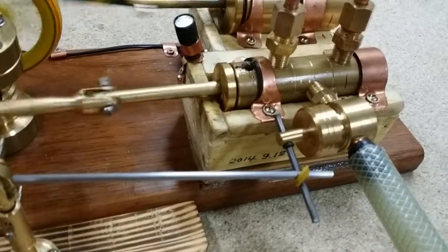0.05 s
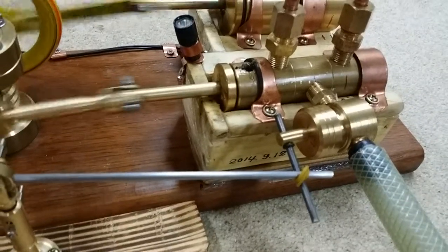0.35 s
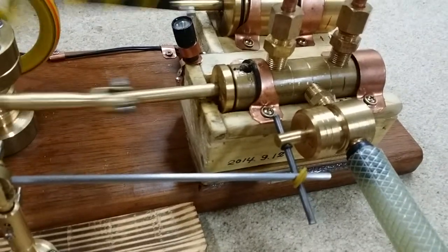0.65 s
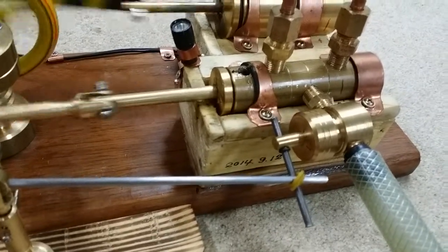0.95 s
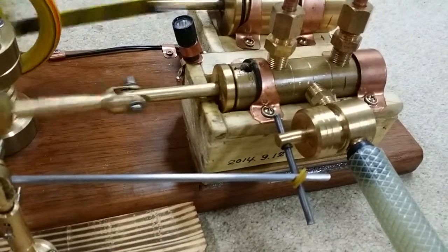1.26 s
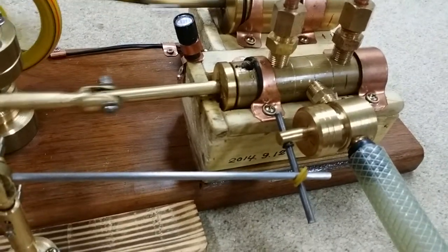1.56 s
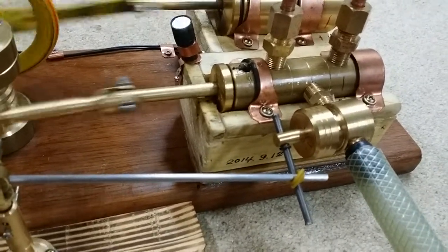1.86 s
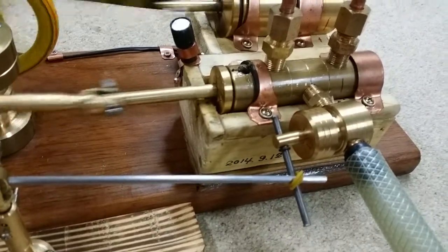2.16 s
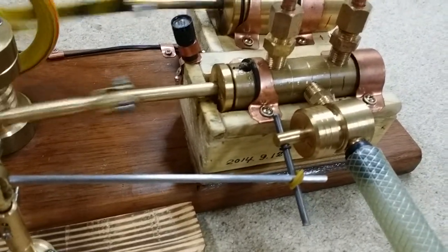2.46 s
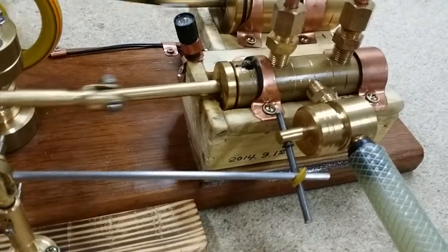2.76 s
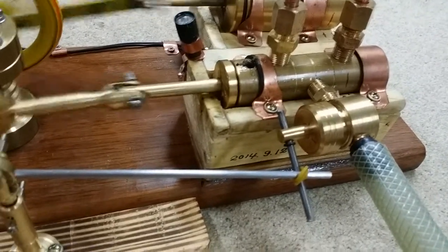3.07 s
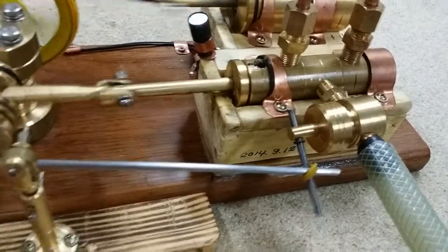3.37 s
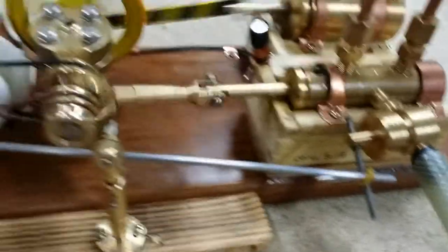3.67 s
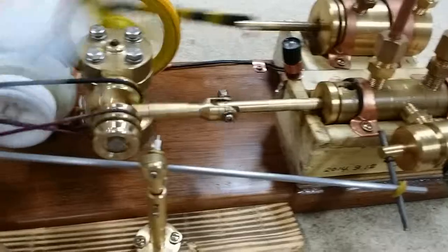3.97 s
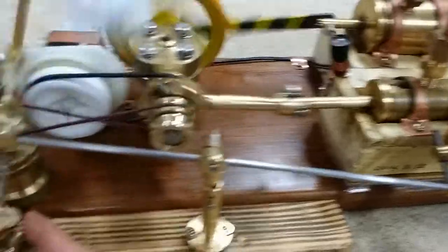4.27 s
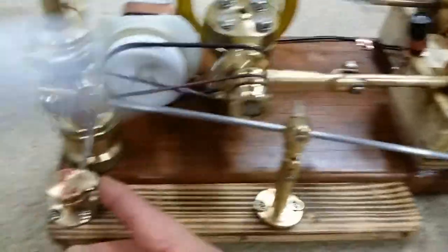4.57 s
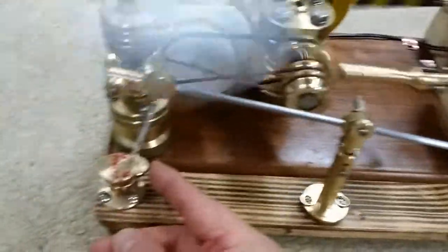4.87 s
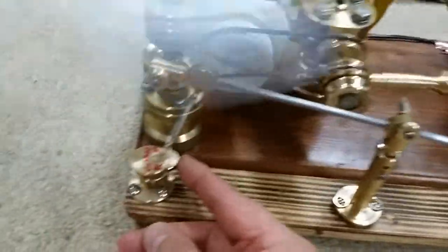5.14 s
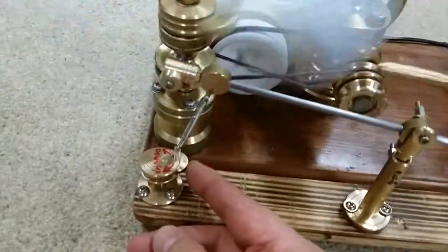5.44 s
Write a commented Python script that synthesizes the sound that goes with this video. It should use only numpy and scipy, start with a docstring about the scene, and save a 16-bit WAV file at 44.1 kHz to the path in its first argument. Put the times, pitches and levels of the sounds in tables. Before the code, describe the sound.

A small brass steam engine runs throughout, heard close up on a wooden board. Each turn gives a tiny tick and a bright metallic knock with a woody body and a brief high ring. The knocks start at nearly six a second and ease to just under five by about 3 seconds, then hold steady. Between them come soft piston thumps, dry valve clicks, short rising squeaks and dull pulley taps that drift off the beat. Steam hisses all along, puffing lightly each turn and gradually softening. It spits briefly at about 0.3, 0.8, 1.5, 2.3 and 2.9 seconds, the last four with a small clink. Faint thin bearing whistles appear around 2.7, 3.2 and from 4.6 to 5.1 seconds. The squeaks fade after 4.2 seconds. The engine drifts from slightly left to slightly right and is still running at 5.7 seconds, with a short workshop echo and low room rumble.

```python
"""A small brass steam engine

On a wooden board in a small workshop, heard up close, it turns about five times a second, slowing a bit.
Once a turn the slack in its rod closes with a tick and a bright knock that rings the flywheel. In
between, the piston thumps softly, the valve clicks and squeaks, and a belt pulley taps. Steam hisses
all along, swells with each turn and spits now and then; a loose link clinks and a dry bearing whistles."""
import sys
import numpy as np
from scipy import signal
from scipy.fft import rfft, irfft, next_fast_len
from scipy.io import wavfile

SR = 44100
rng = np.random.default_rng(int(sys.argv[2]) if len(sys.argv) > 2 else 0)


def to_wav(sig):
    """Store sig (one row per channel, or 1-D mono) as 16-bit WAV at the path in sys.argv[1].

    Samples outside -1..1 are clipped; the rate is SR.
    """
    pcm = np.clip(np.atleast_2d(sig), -1, 1) * 32767
    pcm = np.round(pcm).astype(np.int16)
    wavfile.write(sys.argv[1], SR, pcm.T)  # frames by channels


N = 251811
TIME = np.arange(N) / SR
AGE = np.arange(8192) / SR   # seconds since the start of one short sound

# How fast the crank spins. Each row: time in seconds, turns per second.
CRANK_SPEED = [(0, 5.905), (.28, 5.6286), (.84, 5.4389), (3.08, 4.8407), (4.01, 4.8093), (5.7, 4.8481)]
# The tones of the brass rod and cylinder. Each row: pitch in Hz, width in Hz, relative level in dB.
BRASS_TONES = [(3025, 260, -8.5), (5480, 150, -4.5), (6050, 108, 7), (6467, 606, 7.5), (6815, 588, 10),
               (7990, 340, 2.5), (8220, 12, -30), (9180, 19, 7), (9960, 94, 1), (11540, 106, -10),
               (12610, 40, -14), (13850, 170, -7.5), (14700, 180, -25)]


def from_db(db):
    """Turn decibels into a number to multiply a sound by."""
    return 10 ** (np.asarray(db) / 20)


def along(rows, times):
    """Read a table at any times, drawing straight lines between its rows."""
    row_times, *columns = np.transpose(rows)
    return [np.interp(times, row_times, column) for column in columns]


def colour(x, points):
    """Make some pitches louder and others softer, following a curve of (Hz, dB) points."""
    size = next_fast_len(x.shape[-1] + 2048)
    hz, db = np.transpose(points)
    gain = from_db(np.interp(np.log(np.fft.rfftfreq(size, 1 / SR) + 1), np.log(hz), db))
    return irfft(rfft(x, size) * gain, size)[..., :x.shape[-1]]


def air_noise(size, alike_below_hz=1110):
    """White stereo noise, alike on both sides in the bass and unrelated in the treble."""
    alike = 0.89 / (1 + (np.fft.rfftfreq(size, 1 / SR) / alike_below_hz) ** 2)
    mid, side = rfft(rng.standard_normal((2, size)))
    return irfft(np.sqrt((1 + alike) / 2) * mid + np.sqrt((1 - alike) / 2) * side * [[1], [-1]], size)


def wobble(hz):
    """A smooth random wander, typically about 1 in size; a higher hz makes it quicker."""
    x = signal.sosfilt(signal.butter(2, hz, fs=SR, output="sos"), rng.standard_normal(N + SR))[SR:]
    return x / x.std()


def resonate(x, hz, width_hz):
    """Let through the sound near one pitch; the narrower the width, the longer it rings."""
    r = np.exp(-np.pi * width_hz / SR)
    feedback = [1, -2 * r * np.cos(2 * np.pi * hz / SR), r * r]
    return signal.lfilter(np.array([1, 0, -1]) * (1 - r * r) / 2, feedback, x + 1e-18)


def fade(age, decay_s):
    """A sudden start that dies away."""
    return (age >= 0) * np.exp(-np.clip(age / decay_s, 0, 60))


def swell(age, half_width_s):
    """A smooth rise and fall that peaks at age zero."""
    return np.exp(-(age / half_width_s) ** 2 / 2)


def place(times, sounds):
    """Lay short sounds out in time, in stereo."""
    out = np.zeros((2, N))
    for start_s, sound in zip(times, sounds):
        i = int(start_s * SR)
        if 0 <= i < N:
            out[:, i:i + len(AGE)] += sound[..., :N - i]
    return out


def crank_turns(first_knock_s=0.1505):
    """How many turns the crank has made at each moment, counted from the first knock."""
    speed, = along(CRANK_SPEED, TIME)
    turns = np.cumsum(speed) / SR
    return turns - np.interp(first_knock_s, TIME, turns)


def crank_passes(share, every_turns=1):
    """The times when the crank reaches this share of a turn, and again at equal steps of turning."""
    turns = crank_turns()
    passes = share + every_turns * np.arange(-1, turns[-1] / every_turns + 1)
    return np.interp(passes[(passes > turns[0]) & (passes < turns[-1])], turns, TIME)


def struck(times, level_db, tones, scatter_db):
    """A struck object rings with several fading tones, a little differently on every blow."""
    hz, db, ring_s = np.transpose(tones)   # ring time: how long a tone takes to fall by 60 dB
    waves = np.sin(2 * np.pi * hz[:, None] * AGE) * from_db(-60 * AGE / ring_s[:, None])
    strengths = from_db(level_db[:, None] + db + scatter_db * rng.standard_normal((len(times), len(hz))))
    return place(times, (strengths * (-1) ** np.arange(len(hz))) @ waves)


def brass_hit(times, level_db, force, tones, snap=0, sides_alike=0.17):
    """A clean snap and a rough scrape make brass ring; the level is that of the first 8 ms."""
    rough = rng.choice([-1, 1], (len(times), 3, len(AGE)))
    grit = np.sqrt(sides_alike) * rough[:, :1] + np.sqrt(1 - sides_alike) * rough[:, 1:]
    push = grit * force + snap * (AGE == 0)
    rings = sum((-1) ** k * from_db(db) * resonate(push, hz, width)
                for k, (hz, width, db) in enumerate(tones))
    early_level = np.sqrt(np.mean(rings[..., AGE < 0.008] ** 2, axis=-1, keepdims=True))
    return place(times, rings / early_level * from_db(level_db)[:, None, None])


def room_rumble():
    """The room's own steady, low noise."""
    # Each row: pitch in Hz, level in dB.
    rumble_colour = [(20, -62), (45, -71), (70, -30.5), (105, -22), (140, -23.5), (200, -32.5), (300, -31),
                     (500, -44.5), (1500, -41.5), (8000, -84)]
    return colour(air_noise(N), rumble_colour)


def workshop_echo(x, delay_s=0.008, ring_s=0.18):
    """Sound bounces off the floor and walls and comes back as a short wash of echoes."""
    # The tone of the echo. Each row: pitch in Hz, gain in dB.
    echo_colour = [(60, -14), (120, -15.5), (300, -0.5), (900, -8.5), (3000, -5), (6500, -7.5),
                   (10000, -10), (15000, -13)]
    age = np.arange(SR // 2) / SR
    tail = air_noise(len(age)) * fade(age - delay_s, ring_s / np.log(1000))
    tail = colour(tail / np.sqrt(np.sum(tail ** 2) / 2), echo_colour)
    return signal.fftconvolve(x, tail, axes=1)[:, :N]


def port_opening(open_at=0.66, shuts_from=0.84, start_db=-16, open_db=-1, end_db=-38):
    """Steam let out, in dB: it builds through each turn, holds, and is cut off before the knock."""
    share = crank_turns() % 1
    opening = np.clip(share / open_at, 0, 1) ** 2
    shutting = np.clip((share - shuts_from) / (1 - shuts_from), 0, 1)
    return start_db + (open_db - start_db) * opening + (end_db - open_db) * shutting


def leak(level_db, flutter_db=1.5):
    """Leaking steam hisses and sounds the brass fittings around it."""
    # The tone of the hiss. Each row: pitch in Hz, relative level in dB.
    hiss_colour = [(300, -39), (1100, -38), (1900, -36.5), (3600, -34.5), (5100, -34), (5900, -32.5),
                   (7100, -23), (8000, -24.5), (9200, -25), (10000, -30), (11000, -37), (14500, -51)]
    # The fittings. Each row: pitch in Hz, width in Hz, relative level in dB.
    fitting_tones = [(1500, 49, -54), (2050, 250, -32.5), (3230, 240, -41), (5066, 240, -35.5),
                     (6250, 110, -29), (7380, 570, -22.5), (8900, 85, -36)]
    jet = air_noise(N)
    fittings = sum(from_db(db) * resonate(jet, hz, width) for hz, width, db in fitting_tones)
    return (colour(air_noise(N), hiss_colour) + fittings) * from_db(level_db + flutter_db * wobble(28))


def exhaust(level_db, flutter_db=3, sputter_db=3):
    """Wet steam sputters out of a pipe; the water in it favours now one tone, now another."""
    # The pipe. Each row: pitch in Hz, width in Hz, relative level in dB.
    pipe_tones = [(564, 225, -28.5), (1437, 130, -24), (1706, 125, -17.5), (2090, 133, -18),
                  (2705, 170, -25.5), (3330, 100, -26.5), (3630, 140, -32.5), (4140, 180, -25.5),
                  (4700, 190, -30), (6930, 205, -16.5), (8400, 130, -29)]
    # The rush of steam. Each row: pitch in Hz, relative level in dB.
    rush_colour = [(150, -39), (600, -28.5), (1050, -34.5), (2000, -63), (3600, -32), (4900, -36),
                   (5800, -47), (7200, -31), (9000, -34), (11000, -40), (14500, -39)]
    jet = air_noise(N)
    pipe = sum(from_db(db + flutter_db * wobble(16.6)) * resonate(jet, hz, width)
               for hz, width, db in pipe_tones)
    return (colour(air_noise(N), rush_colour) + pipe) * from_db(level_db + sputter_db * wobble(120))


def steam(leak_db=-0.93, exhaust_db=-4, leak_follows_port=0.066):
    """The steam supply feeds a nearly steady leak and an exhaust that puffs once a turn."""
    # Each row: time in seconds, leak in dB, exhaust in dB. Only the change from the average counts.
    supply = [(0.0, -30.5, -38.5), (0.57, -29.5, -40.5), (1.24, -32, -42), (1.41, -32, -40),
              (1.76, -34, -46.5), (3.13, -33.5, -46), (3.75, -36, -47), (4.52, -34.5, -50.5),
              (5.71, -34.5, -51.5)]
    leak_drift_db, exhaust_drift_db = (db - db.mean() for db in along(supply, TIME))
    port_db = port_opening()
    hiss = leak(leak_db + leak_drift_db + leak_follows_port * (port_db - port_db.mean()))
    return hiss + exhaust(exhaust_db + exhaust_drift_db + port_db)


def spits(ragged_db=1.5):
    """Slugs of water burst out with the steam in short, ragged hisses that ring the pipe."""
    # Each row: start in seconds, relative level in dB, fade time in seconds.
    slugs = [(.319, -18.5, 0.0065), (0.748, -25.5, 0.017), (0.768, -27, 0.0058), (1.485, -23, 0.011),
             (1.51, -32, 0.015), (2.286, -23.5, 0.0092), (2.3, -32, 0.0096), (2.309, -17, 0.004),
             (2.938, -23.5, 0.0014)]
    # The tone of a spit. Each row: pitch in Hz, gain in dB.
    spit_colour = [(200, -28), (900, -6.5), (1850, 7.5), (2130, 13), (2400, 5), (3600, 3), (4900, 7.5),
                   (6200, 1.5), (8000, 11.5), (9800, 6), (11500, -3.5), (15000, -14)]
    times = [start_s for start_s, _, _ in slugs]
    bursts = place(times, [from_db(db) * fade(AGE, decay_s) for _, db, decay_s in slugs])
    return colour(air_noise(N) * bursts * from_db(-ragged_db * wobble(460)), spit_colour)


def rub(middle_s, half_width_s, hz, glide_hz_per_s, db, rough):
    """Rubbing swells into a thin, gliding whistle; more roughness makes it waver more."""
    age = AGE - AGE.mean()
    waver = np.interp(AGE * 330, np.arange(64), rng.standard_normal((64, 2)) @ [1, 1j])
    cycles = hz * age + glide_hz_per_s * age ** 2 / 2
    whistle = np.real((1 + rough * waver) * np.exp(2j * np.pi * cycles))
    return place([middle_s - AGE.mean()], [from_db(db) * swell(age, half_width_s) * whistle])


def dry_bearing():
    """A dry bearing rubs and whistles faintly now and then."""
    # Each row: middle in seconds, half-width in seconds, pitch in Hz, glide in Hz a second, level in dB.
    whistles = [(2.7, .02, 2850, -500, -44), (3.162, .018, 3160, -300, -39),
                (3.175, .022, 2680, -600, -42.5), (4.615, .03, 2870, 500, -42),
                (4.635, .018, 3100, 1200, -43.5), (4.92, .016, 2780, -1000, -40.5),
                (5.12, .018, 2770, 0, -42.5)]
    return sum(rub(*row, rough=0.65) for row in whistles)


def valve_squeaks(pitch_hz=2010, spread_hz=50, spread_db=2):
    """The valve rod rubs with a short rising squeak on every turn, no two alike."""
    # Each row: time in seconds, level in dB.
    loudness = [(0, -30), (1, -31.5), (2, -31), (3.3, -29.5), (4.2, -32.5), (4.7, -42), (5.7, -41)]
    times = crank_passes(0.507)
    off_hz, off_db = (rng.standard_normal((len(times), 2)) * [spread_hz, spread_db]).T
    level_db, = along(loudness, times)
    return sum(rub(middle_s, half_width_s=0.0042, hz=hz, glide_hz_per_s=15000, db=db, rough=0.15)
               for middle_s, hz, db in zip(times, pitch_hz + off_hz, level_db + off_db))


def link_clinks(falloff_db_per_octave=14):
    """A loose link clinks; where it is hit decides which of its tones ring most."""
    # Each row: start in seconds, relative level in dB, favoured pitch in Hz.
    clinks = [(.752, -29, 4130), (0.769, -31, 4300), (1.486, -31, 2090), (1.517, -32, 2090),
              (2.286, -23, 5580), (2.308, -31, 4700), (2.937, -19.5, 7500)]
    # The link. Each row: pitch in Hz, relative level in dB, ring time in seconds.
    link_tones = [(2090, 19, 0.027), (2860, 0, .05), (3220, 2, .05), (4130, -13, 0.088), (4640, 2, 0.028),
                  (5580, -3, .03), (5700, -4, 0.018), (7900, 6, 0.025), (8750, 9, 0.022)]
    hz, db, ring_s = np.transpose(link_tones)
    out = 0
    for start_s, level_db, main_hz in clinks:
        tone_db = db - falloff_db_per_octave * abs(np.log2(hz / main_hz))
        out = out + struck([start_s], np.array([level_db]), np.c_[hz, tone_db, ring_s], scatter_db=1.5)
    return out


def pulley_taps(gap_s=0.024, spread_db=1.5, settled_turns_per_s=4.82):
    """The belt pulley runs a bit quicker than the crank, so its pairs of dull taps drift off the beat."""
    # The pulley and its stand. Each row: pitch in Hz, relative level in dB, ring time in seconds.
    pulley_tones = [(480, 10, 0.0085), (594, 6.5, 0.026), (870, 2, 0.021), (1223, -7.5, 0.056),
                    (1860, -17, 0.011)]
    times = crank_passes(-0.1927, every_turns=0.92434)
    speed, = along(CRANK_SPEED, times)
    first_db = -38.5 + 9.2 * (speed - settled_turns_per_s)   # louder at higher speed
    second_db = -37 - 2.5 * (-1) ** np.arange(len(times))   # weak and strong by turns
    level_db = np.r_[first_db, second_db] + spread_db * rng.standard_normal(2 * len(times))
    return struck(np.r_[times, times + gap_s], level_db, pulley_tones, scatter_db=1.7)


def valve_clicks(decay_s=0.0014, rise_s=0.0003, jitter_s=0.0008):
    """The valve gear gives a light, dry click each time it reverses."""
    # Each row: when it comes as a share of the turn, relative level in dB.
    reversals = [(0.482, -25.5), (0.849, -31.5)]
    force = fade(AGE, decay_s) - fade(AGE, rise_s)
    clicks = 0
    for share, db in reversals:
        times = crank_passes(share)
        times = times + rng.normal(0, jitter_s, len(times))
        clicks = clicks + brass_hit(times, np.full(len(times), db), force, BRASS_TONES)
    return from_db(-0.5) * resonate(clicks, hz=7850, width_hz=1200)


def piston_thumps(middle_s=0.02):
    """Each reversal of the piston gives the board a short, smooth heave, and it rocks back."""
    # Each row: share of the turn, pitch in Hz, half-width in seconds, relative level in dB.
    heaves = [(0.095, 111, 0.0088, -33.5), (0.434, 162, 0.0029, -24.5), (0.503, 192, 0.0034, -46),
              (0.572, 103, 0.0087, -45), (0.874, 130, 0.003, -26.5)]
    # How heavy the strokes are. Each row: time in seconds, gain in dB.
    stroke_weight = [(0, 1.5), (1.3, 1), (1.8, -2.5), (3, -3.5), (5.7, -2.5)]
    age = AGE - middle_s
    out = 0
    for share, hz, half_width_s, db in heaves:
        times = crank_passes(share) - middle_s
        heave = np.cos(2 * np.pi * hz * age) * swell(age, half_width_s)
        out = out + place(times, from_db(db + rng.normal(0, 1, (len(times), 1))) * heave)
    weight_db, = along(stroke_weight, TIME)
    return out * from_db(weight_db)


def board_knock(times, level_db, push_hz=760):
    """A blow reaches the wooden board as one short, hard push and sets it ringing."""
    # The board and frame. Each row: pitch in Hz, relative level in dB, ring time in seconds.
    board_tones = [(106.2, -15.5, 0.056), (175, -15.5, 0.13), (252, -20, 0.13), (332, -25, 0.12),
                   (381, -22, 0.31), (495.5, -22, 0.18), (581.6, -6.5, 0.082), (751.5, -4, 0.059),
                   (870, 4.5, 0.015), (860, -22, 0.0067), (1380, 0, 0.021), (1477, -6.5, 0.023),
                   (1730, -31, 0.028), (2125, -5.5, 0.023), (2780, -15, 0.017), (2950, -33, 0.005)]
    ring = struck(times + 0.00167, level_db - 3.5, board_tones, scatter_db=2.5)
    age = AGE - 0.002276   # the push peaks just after the blow
    push = -np.cos(2 * np.pi * push_hz * age) * swell(age, 0.000067)
    return ring + place(times, from_db(level_db + 6)[:, None] * push)


def frame_rattle(times, level_db, shape, alike=0.35):
    """The frame's many tones blur into a noisy rattle that is partly the same on every blow."""
    # Each row: pitch in Hz, gain in dB.
    rattle_colour = [(200, 15), (500, 10), (850, 19.5), (1500, 18.5), (3100, 17), (4200, 13), (6000, 6.5),
                     (8000, -22), (11000, -2), (15000, -20)]
    usual = air_noise(len(AGE))
    noise = np.array([np.sqrt(alike) * usual + np.sqrt(1 - alike) * air_noise(len(AGE)) for _ in times])
    return place(times, from_db(level_db)[:, None, None] * shape * colour(noise, rattle_colour))


def flywheel_ring(times, level_db, in_step_s=0.00721):
    """Two close tones of the flywheel drift in and out of step, so its ring dips and comes back."""
    # Each row: pitch in Hz, relative level in dB, ring time in seconds before the stretch below.
    wheel_tones = [(6155, 4, .095), (8347, 11, .15), (8381, 5.5, .15)]
    stretch = rng.uniform(0.7, 1.1, (len(times), 1))   # the crank damps it more on some turns
    ring = sum(from_db(db - 60 * AGE / (ring_s * stretch)) * np.sin(2 * np.pi * hz * (AGE - in_step_s))
               for hz, db, ring_s in wheel_tones)
    return place(times, from_db(level_db)[:, None] * ring)


def rod_knocks(tick_lead_s=0.0062):
    """The rod ticks through its slack, slams home, bounces, and shakes the board, frame and flywheel."""
    # Each row: start in seconds, then relative levels in dB of the crack, board, flywheel and tick.
    blows = [(0.151, -17, -20, -39, -41), (0.3271, -15.5, -19, -30.5, -28),
             (0.5067, -15, -19.5, -28.5, -37), (0.6866, -16.5, -21.5, -30, -27),
             (0.8701, -16.5, -22, -33, -41), (1.0548, -15.5, -23, -30, -36), (1.2421, -15.5, -23, -38, -26),
             (1.4304, -16.5, -22, -28.5, -32), (1.6225, -16, -22, -42, -46),
             (1.8129, -19.5, -21.5, -33, -26), (2.0064, -18, -22, -31.5, -30),
             (2.2019, -18.5, -24, -29, -25), (2.4011, -19, -24, -29, -31), (2.6005, -19, -22.5, -28, -38),
             (2.8039, -19.5, -24, -39, -29), (3.008, -18.5, -22.5, -29.5, -24.5),
             (3.2148, -17.5, -24.5, -30.5, -30), (3.4214, -19, -24, -31.5, -24.5),
             (3.629, -18, -23.5, -36, -33), (3.8358, -16.5, -23.5, -35.5, -42),
             (4.0446, -15, -22, -38, -30), (4.2512, -14, -23, -40, -35), (4.4602, -15, -23, -50, -43),
             (4.6674, -15, -24, -30, -26), (4.875, -15.5, -23, -36, -25.5),
             (5.0806, -16.5, -24.5, -36, -23.5), (5.2869, -15.5, -24, -36, -27.5),
             (5.493, -16, -23, -33, -28.5), (5.7007, -13.5, -23.5, -33, -28)]
    # The rod alone, sliding through its slack. Each row: pitch in Hz, width in Hz, relative level in dB.
    rod_tones = [(2490, 220, -11), (4300, 260, -11), (6650, 110, 2), (8500, 1600, -21), (10070, 106, 8),
                 (13600, 140, -11)]
    times, crack_db, board_db, wheel_db, tick_db = np.transpose(blows)
    tick_times = times - tick_lead_s
    bounce_s = rng.uniform(0.0011, 0.0048, (len(times), 1, 1))
    scrape = from_db(-4) * fade(AGE, 0.0013)
    bounce = from_db(-8.5) * fade(AGE - bounce_s, 0.0027)
    buzz = from_db(-26) * fade(AGE, 0.014)
    crack = brass_hit(times, crack_db + 1, scrape + bounce + buzz, BRASS_TONES, snap=4.5)
    tick = brass_hit(tick_times, tick_db - 2, fade(AGE, 0.005), rod_tones, snap=5.2)
    wood = board_knock(times, board_db)
    # the frame stirs at the tick, and its rattle builds up just after the blow
    stir = frame_rattle(tick_times, tick_db - 13.5, fade(AGE, 0.0099))
    shake = fade(AGE, 0.0057) - fade(AGE, 0.0015) + from_db(-31) * fade(AGE, 0.0048)
    rattle = frame_rattle(times, board_db - 4, shake)
    return crack + tick + wood + stir + rattle + flywheel_ring(times, wheel_db - 1)


def scene(parts_left_db=1):
    """The engine and its steam drift from a little left to a little right, over the room's rumble."""
    # Each row: time in seconds, how much louder the left is in dB, how much later it is in milliseconds.
    position = [(0, 1.2, -0.24), (2.8, 2, -0.21), (3.7, 1, -0.14), (4.7, -2, -0.04), (5.7, -2.8, 0.048)]
    pan_db, lag_ms = along(position, TIME)
    leftward = np.array([[0.5], [-0.5]])   # half is added on the left, half taken from the right
    moving_parts = rod_knocks() + valve_clicks() + pulley_taps() + link_clinks()
    hits = moving_parts * from_db(parts_left_db * leftward) + spits()
    thumps = piston_thumps()
    left, right = (hits + valve_squeaks() + dry_bearing() + steam()) * from_db(pan_db * leftward)
    lag_samples = np.round(lag_ms * SR / 1000)
    right = np.interp(TIME + lag_samples / SR, TIME, right)
    return np.array([left, right]) + thumps + workshop_echo(hits + thumps) + room_rumble()


def record(dry, bass_cut_hz=70, top_cut_hz=14750):
    """The microphone cuts the deep bass, dulls the right side, clips peaks and cuts the highest treble."""
    # The tone of the microphone's right side. Each row: pitch in Hz, gain in dB.
    right_colour = [(1000, 0), (4000, -1), (5500, 4), (6200, 2.5), (7000, -6.5), (8000, -12.5), (9200, -12),
                    (10500, -10.5), (12000, -6.5), (14000, -12)]
    left, right = signal.sosfilt(signal.butter(2, bass_cut_hz, "high", fs=SR, output="sos"), dry)
    clipped = np.clip([left, colour(right, right_colour)], -1, 1)
    return signal.sosfilt(signal.ellip(10, 0.1, 80, top_cut_hz, fs=SR, output="sos"), clipped)


dry = scene()
out = record(dry)
to_wav(out)
```